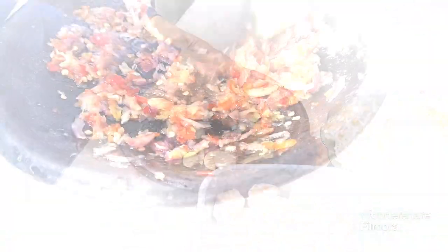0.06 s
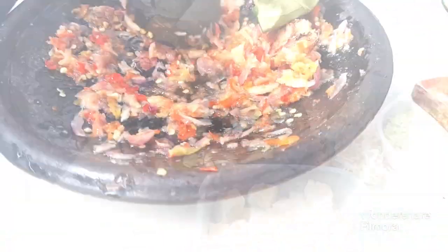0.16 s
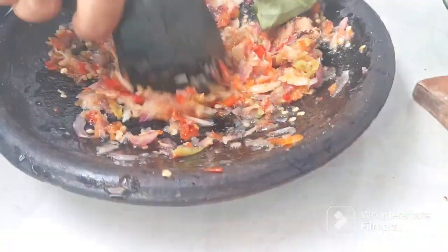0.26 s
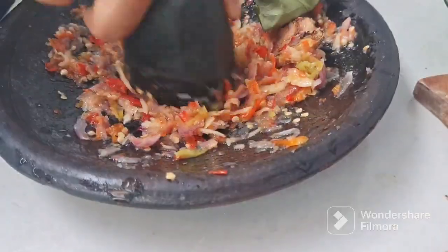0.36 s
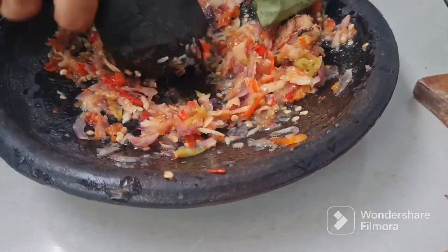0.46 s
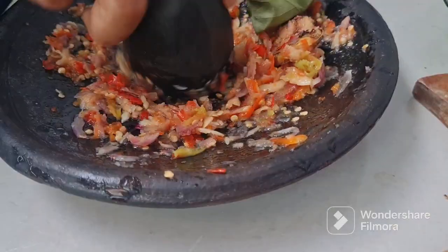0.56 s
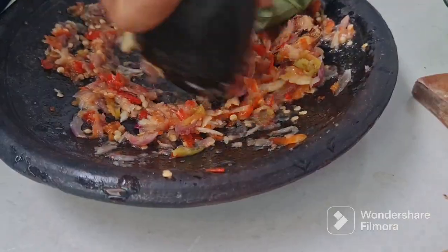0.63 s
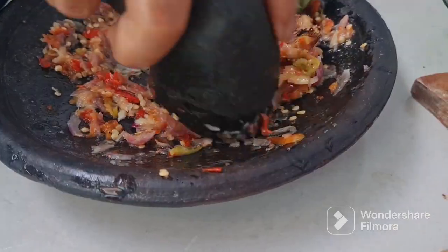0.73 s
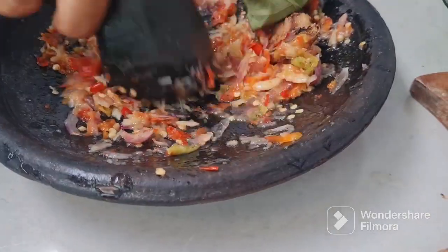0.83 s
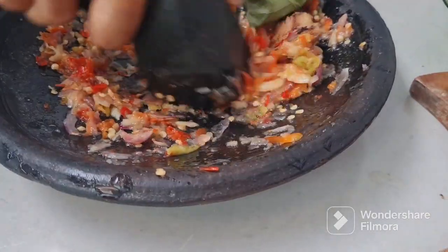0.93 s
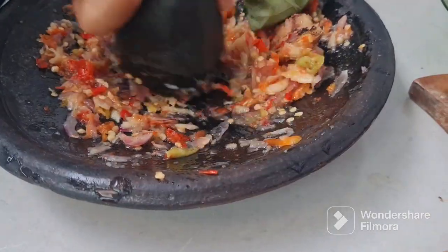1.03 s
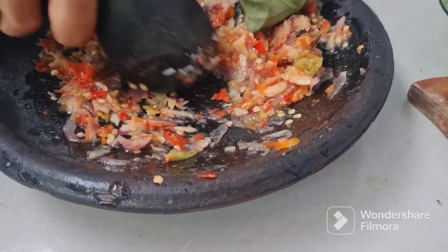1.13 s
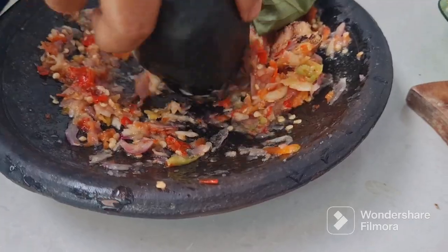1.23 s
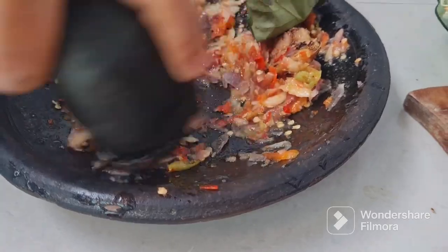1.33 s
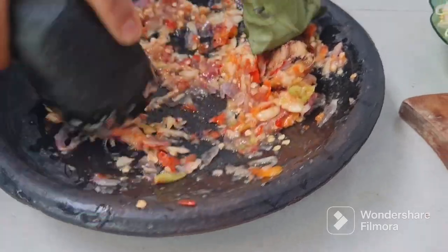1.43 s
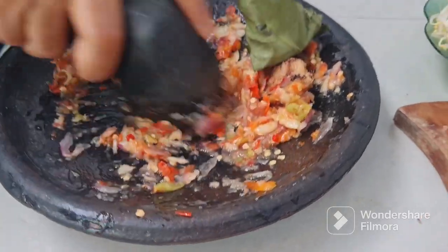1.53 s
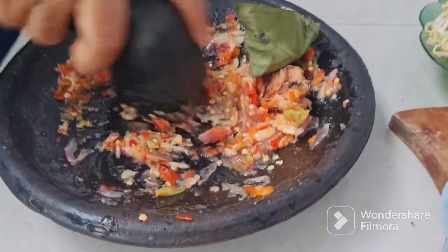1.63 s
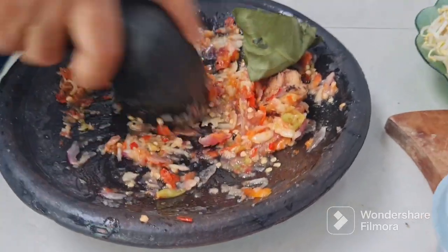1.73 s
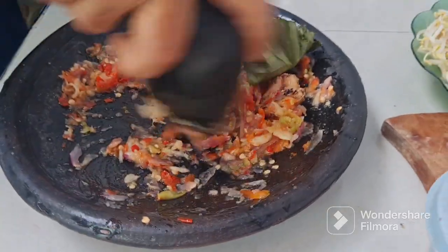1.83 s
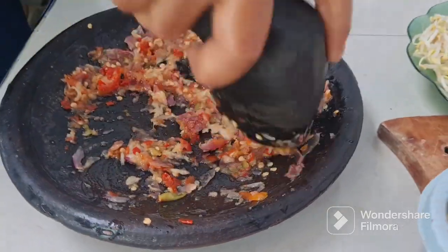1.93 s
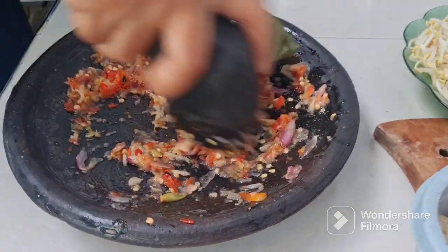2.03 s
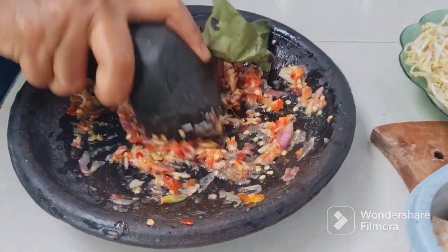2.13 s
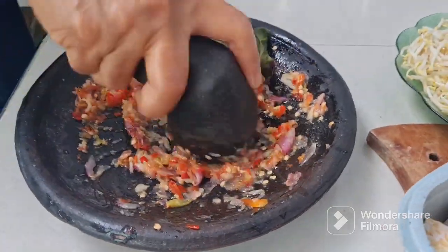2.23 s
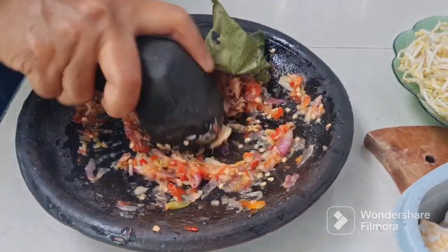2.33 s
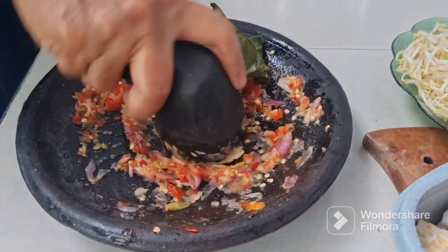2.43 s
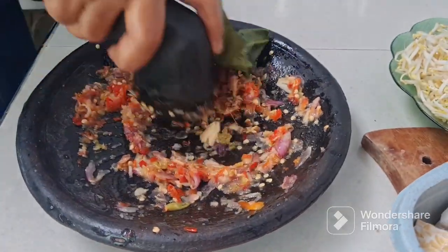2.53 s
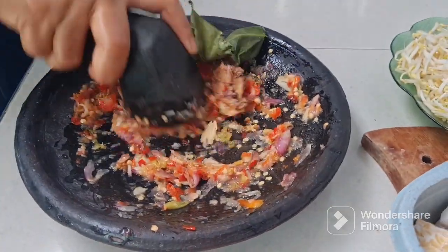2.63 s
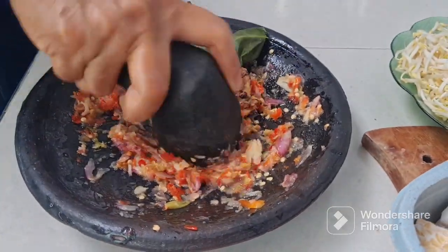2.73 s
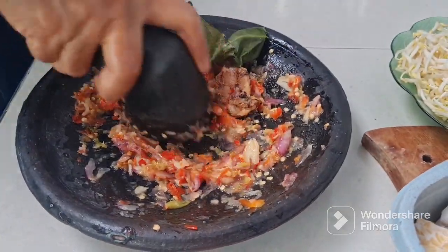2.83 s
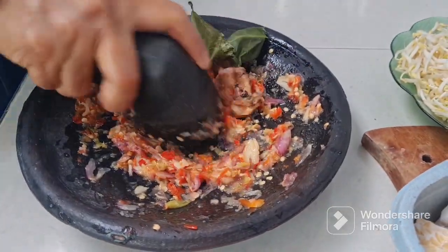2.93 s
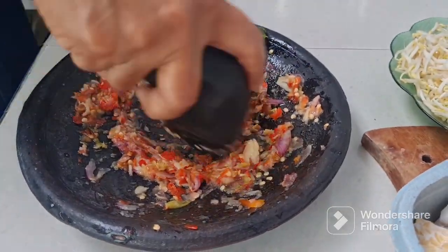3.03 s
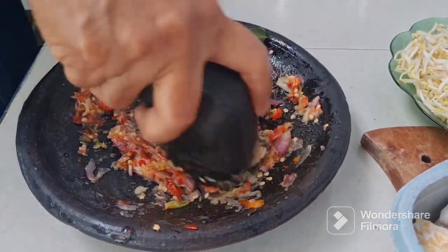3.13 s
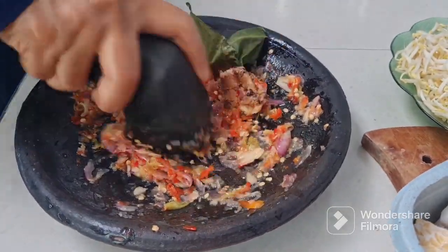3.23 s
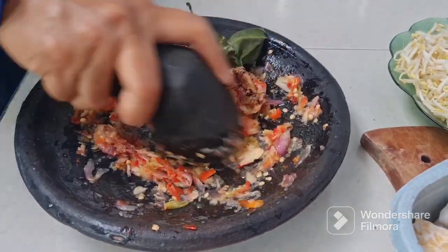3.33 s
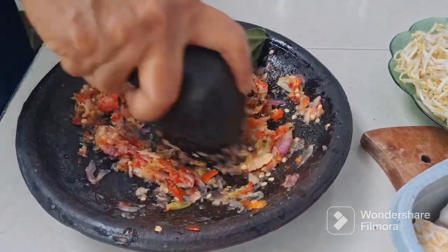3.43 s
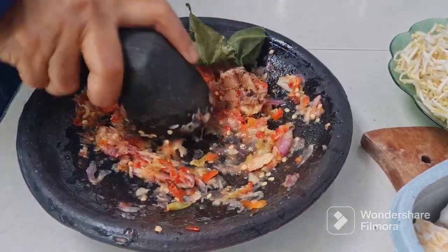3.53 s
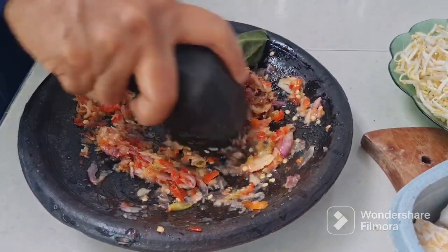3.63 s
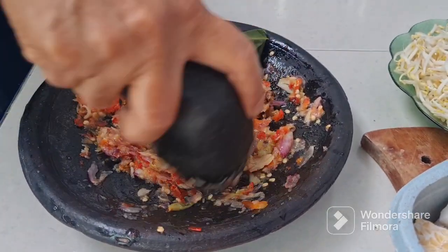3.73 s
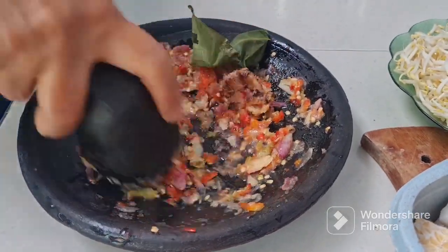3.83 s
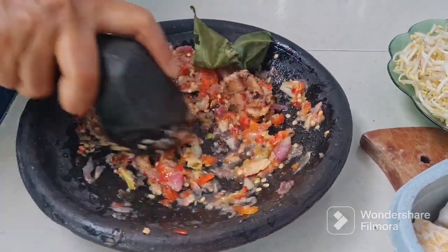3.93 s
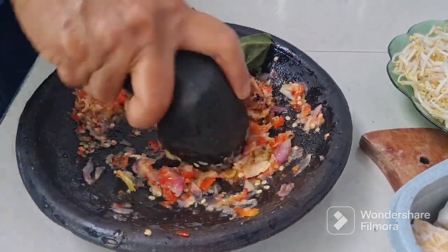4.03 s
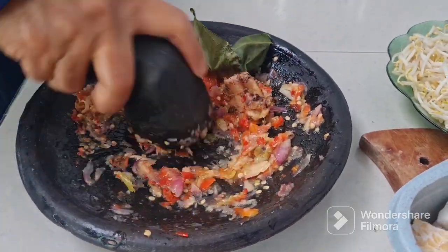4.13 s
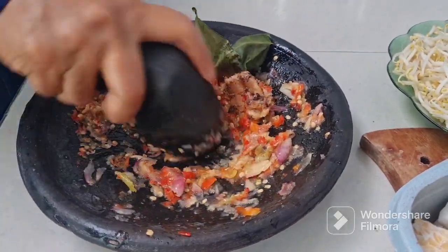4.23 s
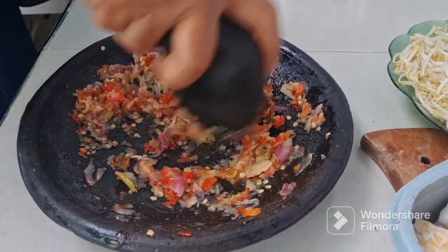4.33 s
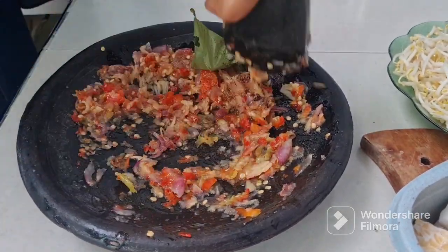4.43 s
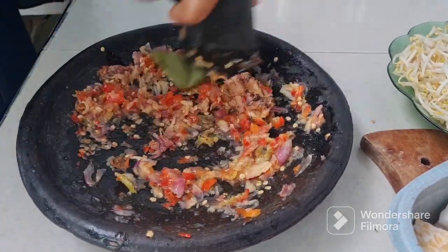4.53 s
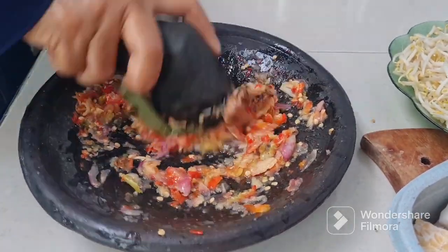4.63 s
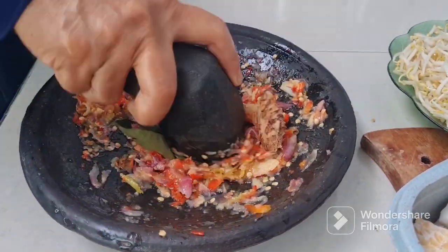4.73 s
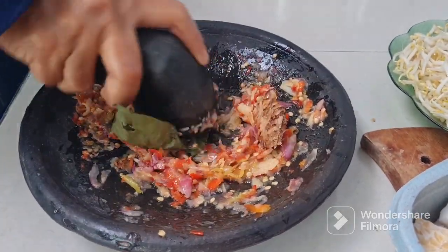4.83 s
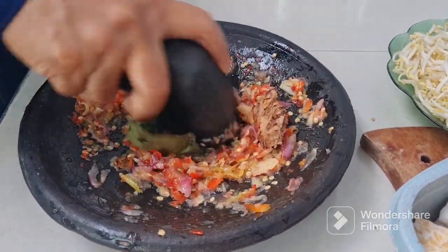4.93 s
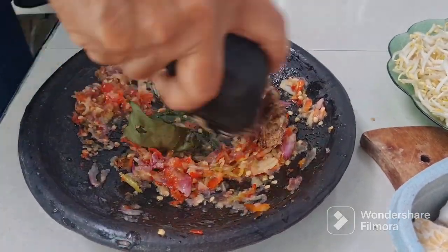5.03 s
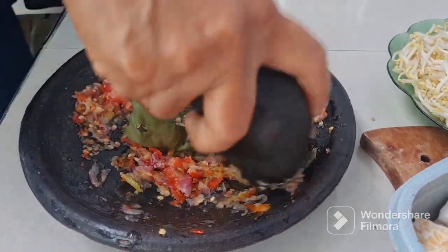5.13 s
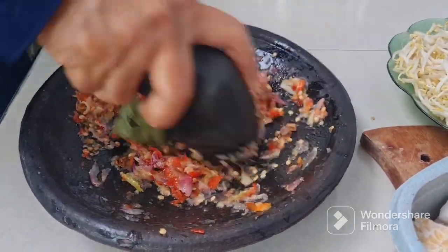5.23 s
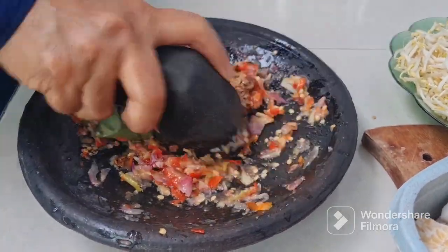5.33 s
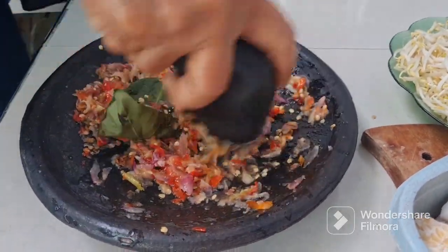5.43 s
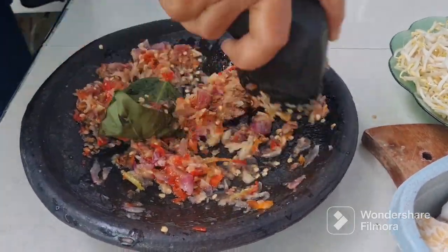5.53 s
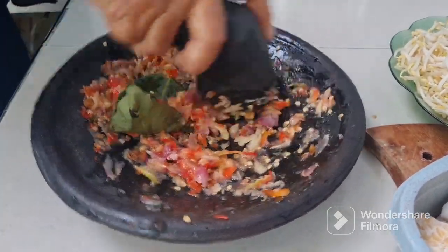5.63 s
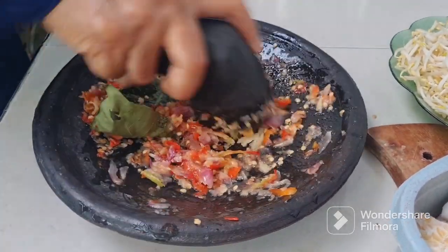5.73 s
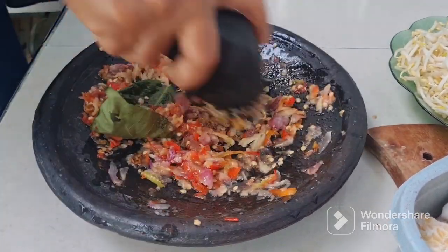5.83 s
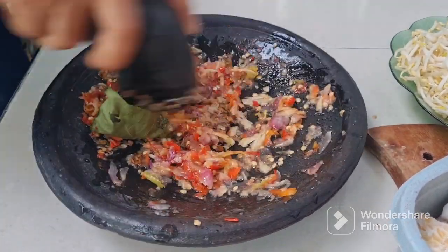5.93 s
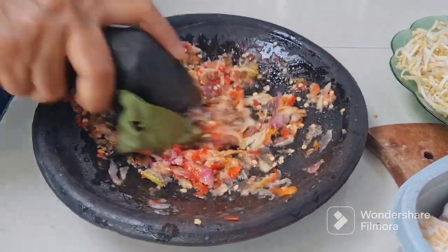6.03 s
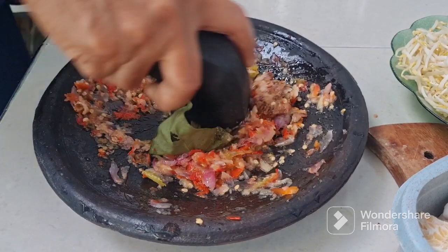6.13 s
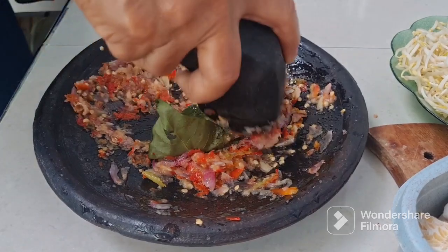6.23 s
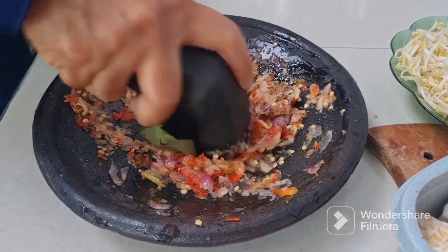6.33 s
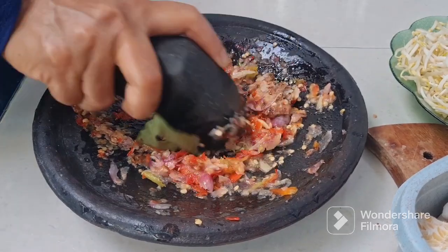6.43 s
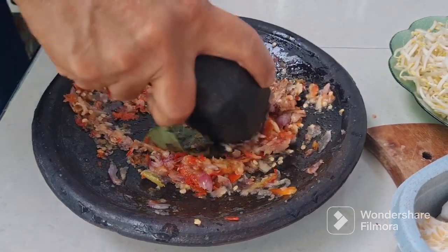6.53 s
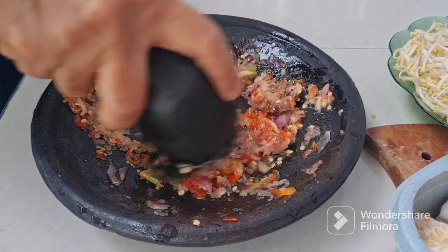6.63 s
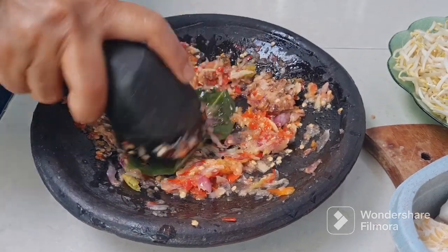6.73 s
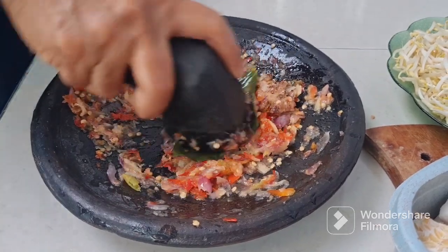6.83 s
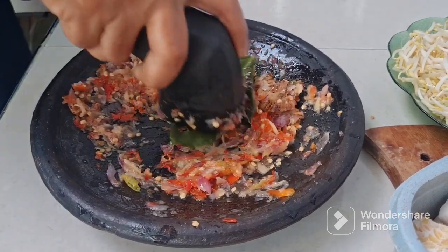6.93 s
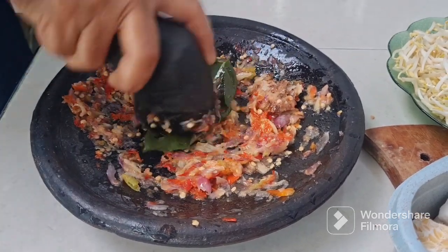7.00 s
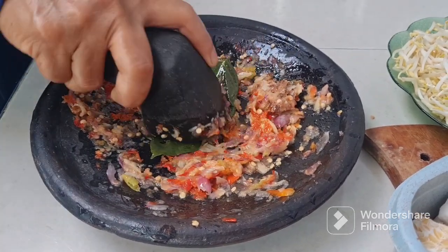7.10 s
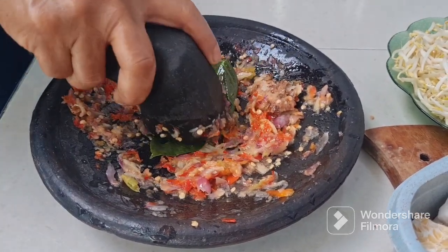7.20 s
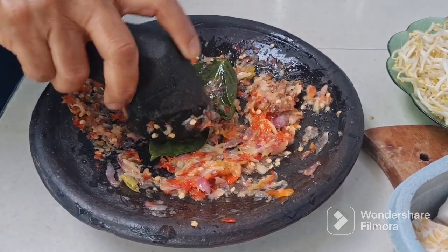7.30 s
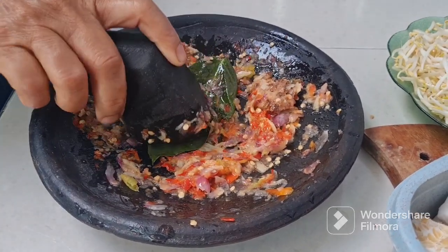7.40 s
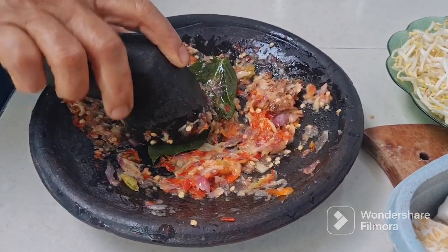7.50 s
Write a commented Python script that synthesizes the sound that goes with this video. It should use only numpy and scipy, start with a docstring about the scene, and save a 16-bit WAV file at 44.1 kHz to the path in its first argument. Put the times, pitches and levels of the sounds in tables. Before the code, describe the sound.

Close, irregular knocks of stone on stone run throughout as a pestle pounds moist vegetables and spices in a mortar. Each low thump is followed by brief gritty, rumbling grinding, with soft squelches and crisp little pops of seeds and skins. The hardest blows come a little past the middle, and the last ones are softer. The kitchen echoes slightly, with a faint hum early on and a faint distant whine near the end.

```python
"""Dull thuds and sharp clacks: a stone pestle pounds and grinds chillies, shallots and garlic in a
shallow stone mortar on a kitchen table. Each impact excites the low modes of mortar and table, and
the short-lived high modes of the stone. Between blows, stick-slip friction makes the pestle judder
over the grit, while wet pulp crackles and seeds snap as they fracture. The hard-walled room
reverberates; a faint motor hum and a far whine lie behind."""
import sys
import numpy as np
from scipy import signal
from scipy.fft import rfft, irfft
from scipy.io import wavfile
from scipy.ndimage import map_coordinates

SR = 44100
rng = np.random.default_rng(int(sys.argv[2]) if len(sys.argv) > 2 else 0)


def transcribe(u):
    """Save the signal u as a 16-bit wav file named by the first command-line argument.

    u: samples, shape (n,) or (channels, n), limited to [-1, 1]; the rate is SR.
    q: integer samples, one column per channel.
    """
    v = np.clip(np.atleast_2d(u).T, -1, 1)
    q = np.round(v * 32767).astype(np.int16)
    wavfile.write(sys.argv[1], SR, q)


N = 333396
TIME = np.arange(N) / SR
BIN_HZ = np.arange(N // 2 + 1) * SR / N

# Levels in the tables are relative: each layer has its own gain.
# pestle blows: (t/s, thud level/dB, thud centre f/Hz, clack level/dB, bright edge level/dB)
BLOWS = [(0.045, -23, 458, -37.5, -41), (0.213, -14, 245, -25, -23.5), (0.525, -8.5, 240, -26, -26.5),
         (0.537, -10.5, 290, -32, -31), (0.558, -12, 240, -32, -51), (0.592, -10, 270, -31, -49),
         (0.789, -8.5, 263, -12, -26), (0.923, -16, 241, -29.5, -33.5), (0.952, -15, 246, -29.5, -38),
         (1.177, -11, 266, -26.5, -36), (1.21, -8.5, 255, -33, -37), (1.236, -12, 270, -26.5, -48),
         (1.413, -8.5, 238, -15, -46), (1.603, -17, 256, -27.5, -38), (1.806, -16.5, 236, -30, -44),
         (2.076, -7.5, 218, -45, -55), (2.21, -14.5, 387, -33.5, -40), (2.389, -23, 166, -41, -45),
         (2.448, -9, 293, -25.5, -35.5), (2.747, -6.5, 245, -22, -28), (2.947, -9.5, 245, -23, -24.5),
         (2.971, -20, 207, -32, -42), (2.999, -10, 253, -45, -40), (3.017, -12, 274, -27.5, -46),
         (3.183, -22.5, 226, -60, -62), (3.341, -14, 258, -29, -32), (3.386, -10, 390, -21.5, -31.5),
         (3.6, -9, 240, -23.5, -27.5), (3.626, -9, 347, -27, -33), (3.662, -8.5, 260, -24, -28.5),
         (3.857, -12, 223, -29.5, -39), (4.051, -14, 426, -28.5, -36), (4.244, -6.5, 232, -20.5, -24),
         (4.264, -11, 350, -25.5, -42), (4.614, -15.5, 254, -16.5, -13.5), (4.722, -13.5, 315, -24.5, -24),
         (4.932, -22, 200, -38.5, -41), (5.208, -3.5, 266, -14.5, -22), (5.216, -28, 293, -15, -36),
         (5.275, -4, 255, -20.5, -22.5), (5.642, -10, 433, -18, -20), (5.717, -9, 303, -12.5, -16.5),
         (6.063, -11.5, 415, -24, -26), (6.103, -9.5, 430, -23, -18), (6.126, -12, 416, -24, -38),
         (6.488, -28.5, 270, -50, -50), (6.747, -8, 240, -38, -44), (6.83, -16, 243, -34.5, -37),
         (7.155, -19.5, 276, -43, -47), (7.385, -17.5, 240, -41.5, -44)]
# modes of the mortar rocking on the table: (f/Hz, level/dB, T60/s)
ROCKING_MODES = [(121, -5, 0.12), (169.6, -2.5, 0.15), (224.7, 3, 0.063), (240, 2, 0.14), (266, -5, 0.16),
                 (296.3, -3.5, 0.18), (336.3, -3.5, 0.18), (383, -8, 0.059), (411.8, 1, 0.14),
                 (464.8, -1.5, 0.11), (592, -13, 0.13)]
# modes of pestle and bowl: (f/Hz, level/dB, T60/s)
BOWL_MODES = [(690, -3, .04), (784, -2, .05), (900, -3, .015), (1150, -2, .015), (1330, 0, .012),
              (1676, 0, .014), (1900, 2, .022), (2150, -1, .01), (2420, 0, .013), (2746, -2, .014),
              (3127, -4, .012)]
# where the pestle lands, heard in its clack: (t/s, left minus right level/dB)
CLACK_PAN = [(0.5, -1), (0.79, 1), (1.41, 2), (2.9, 0), (4.25, -0.5), (4.61, 3), (5.2, 2), (6.1, -2.5)]
# seeds and skins bursting: (t/s, peak level/dB, f/Hz, squelch level re burst/dB)
BURSTS = [(0.0587, -16, 3200, -26), (0.177, -33, 6430, -15), (0.2087, -14.5, 2900, -21),
          (0.3157, -22, 7900, -11), (0.36, -10.5, 3500, -10), (0.5137, -17, 2700, -13),
          (0.6214, -20.5, 5640, -12), (0.9772, -11, 5770, -21), (1.168, -16.5, 5560, -10.5),
          (1.222, -13.5, 9600, -23), (1.2464, -14.5, 5700, -17.5), (1.657, -20, 5650, -30),
          (1.782, -13.5, 5540, -19), (2.231, -6.5, 10100, -27), (2.2443, -7, 5160, -33),
          (2.381, -16.5, 8000, -14), (2.47, -9.5, 5000, -25), (2.659, -27, 5500, -20),
          (2.757, -10.5, 7100, -20), (2.9242, 3, 5500, -32), (2.991, -2.5, 5500, -20.5),
          (3.378, -14.5, 5100, -9.5), (3.4205, -12.5, 5430, -19), (3.557, -10.5, 9800, -34),
          (3.583, -4, 5200, -16), (3.868, -22, 4400, -5), (3.946, -13, 7390, -22), (3.9927, -5, 5500, -36),
          (4.072, -10, 5000, -28), (4.027, -16, 3270, -16), (4.149, -20.5, 2040, -8),
          (4.5705, -28.5, 3990, -11), (4.5983, -27, 2700, -2), (4.9641, -16, 5260, -12),
          (5.3532, -22.5, 4970, -3.5), (5.4155, -19.5, 5030, -10), (5.6396, -15, 3130, -22),
          (6.052, -13.5, 4200, -15), (6.4932, -28, 5500, -4), (6.7233, -18.5, 5050, -11),
          (6.8259, -4.5, 9400, -30), (7.0705, -5.5, 4960, -12.5), (7.382, -12.5, 4970, -22)]
# pushes through the pulp: (t/s, duration/s, pulp level/dB, scrape level/dB, judder level/dB)
STROKES = [(0.045, 0.039, -42, -45, -33), (0.202, 0.14, -37, -42, -27.5), (0.289, .14, -36.5, -35, -42),
           (0.482, 0.11, -36.5, -44, -30), (0.785, 0.35, -41.5, -44, -28.5),
           (1.144, 0.099, -40, -49, -29.5), (1.41, 0.16, -44.5, -49, -31), (1.535, 0.19, -41.5, -46, -32.5),
           (1.722, .08, -44, -45, -27), (2.054, 0.2, -39, -41, -39), (2.19, 0.17, -41.5, -40, -32),
           (2.38, 0.094, -32.5, -42, -21.5), (2.635, 0.11, -37, -36.5, -31),
           (2.76, 0.12, -35.5, -37, -30.5), (2.932, 0.12, -41, -43, -26), (3.171, 0.14, -39.5, -43, -33),
           (3.333, 0.077, -34.5, -35.5, -18.5), (3.491, 0.062, -35, -36.5, -32),
           (3.585, 0.093, -32, -37, -19.5), (3.86, 0.35, -37, -36, -27), (4.234, 0.062, -34.5, -40, -20.5),
           (4.602, 0.15, -41, -54, -25.5), (4.808, 0.19, -43, -42, -34), (5.206, 0.23, -38, -40.5, -23),
           (5.631, 0.16, -41, -34.5, -27), (5.808, 0.1, -62, -39, -25), (6.036, 0.16, -40.5, -50, -28),
           (6.34, 0.2, -42.5, -49.5, -39.5), (6.676, 0.084, -37.5, -41, -44.5),
           (6.793, 0.06, -33.5, -34, -25), (7.065, .04, -39, -53, -39), (7.442, 0.096, -55, -44.5, -42)]
# spectra of the juddering pestle, scraped stone and crushed pulp: (f/Hz, level/dB)
JUDDER_SPECTRUM = [(40, -31), (80, -13), (130, -2), (200, -7), (250, 4.5), (330, -2.5), (420, -3),
                   (550, -19), (780, -17.5), (1100, -38), (2000, -63)]
SCRAPE_SPECTRUM = [(400, -3), (750, -18), (1200, -16), (1900, -5), (2700, 4.5), (3600, 5), (5000, -4.5),
                   (9000, -19)]
PULP_SPECTRUM = [(1500, 21.5), (3200, -3.5), (5400, 4), (7500, -1.5), (10000, -2.5), (13000, -3.5),
                 (16000, -11)]
# kitchen reverberation: (f/Hz, T60/s, level/dB)
REVERBERATION = [(100, 0.78, -6), (298, 0.61, -0.5), (780, 0.49, 4), (2020, 0.56, 0.5), (3940, 0.56, -2),
                 (8000, 0.52, -6), (15200, 0.32, 2)]
# colour of the two microphone ports: (f/Hz, left minus right level/dB)
PORT_BALANCE = [(60, -10), (87, -7.5), (130, -1), (180, -3.0), (260, -3.5), (380, -1.5), (550, -3.5),
                (790, -1.5), (1140, -3), (1650, -0.5), (2380, -6), (3440, -5.5), (4970, -9), (7180, -5.5),
                (10400, -2.5), (15000, -5.5)]
# hum of a motor outside: (t/s, fundamental level/dB, fourth harmonic level/dB)
HUM_LEVELS = [(0, -50, -54), (1.7, -54, -49.5), (2.3, -45, -33), (2.9, -43, -33), (3.3, -46, -44),
              (4.2, -43.5, -41.5), (4.8, -55, -56), (7.56, -78.5, -65)]
# far whine: (t/s, f/Hz, level/dB)
WHINE_CONTOUR = [(6.1, 738, -83), (6.3, 752, -44.5), (6.55, 751, -65.5), (6.7, 774, -45), (7.0, 767, -49.5),
                 (7.2, 747, -61), (7.33, 696, -52), (7.42, 622, -47.5), (7.56, 645, -48)]
# spectrum of the room air: (f/Hz, level/dB)
AIR_SPECTRUM = [(22, -7), (32, 3), (44, 6.5), (60, 5), (120, -4), (250, -16), (500, -24), (800, -10.5),
                (1300, -28), (3000, -18.5), (7000, -33), (16000, -42)]


def thuds(focus_octaves, squash_s):
    """Cushioned impact: pulp spreads the force in time, so the modes of mortar and table swell briefly."""
    out, t = np.zeros(N), TIME[:SR // 4]
    mode_hz = np.array(ROCKING_MODES)[:, 0]
    for s, db, centre_hz, _, _ in BLOWS:
        weights = 1 / (1 + (np.log2(mode_hz / centre_hz) / focus_octaves) ** 2)
        ring = weights @ damped_modes(ROCKING_MODES, t, scatter_db=1.0)
        thud = ring * (1 - np.exp(-t / squash_s))
        add(out, s, from_db(db) * unit_energy(band(thud, 62, 1500)))
    return out


def clacks(crack_s, ring_share, edge_db, tick_share, hardness_hz):
    """Hard impact: stone on stone cracks and rings; a harder blow is briefer, so its spectrum is wider."""
    out, t = np.zeros(N), TIME[:SR // 10]
    for s, _, _, clack_db, bright_db in BLOWS:
        crack = unit_energy(band(rng.standard_normal(len(t)) * np.exp(-t / crack_s), 310, 7100))
        ring = unit_energy(damped_modes(BOWL_MODES, t, scatter_db=2.5).sum(0))
        blow = crack + ring_share * ring
        top_hz = 800 + hardness_hz * from_db(clack_db)
        body = unit_energy(band(blow, 535, top_hz))
        edge = unit_energy(band(blow, 1610, 3160))   # stronger where no pulp lies between
        tick = tick_share * unit_energy(band(crack, 6400, 14000))
        add(out, s, from_db(clack_db) * (body + tick) + from_db(bright_db + edge_db) * edge)
    return out


def snaps(burst_s, swell_s, tear_s, width):
    """Fracture under load: a squeezed piece leaks juice, bursts, and its skin tears on a little longer."""
    out, t = np.zeros(N), TIME[:SR // 8] - TIME[SR // 32]   # the burst is at t = 0
    swell = np.exp(-np.maximum(-t / swell_s, t / tear_s))
    for s, db, hz, squelch_db in BURSTS:
        burst, tear, lumps = rng.standard_normal((3, len(t)))
        forces = np.array([burst * (t >= 0) * np.exp(-np.abs(t) / burst_s), tear * lumps])
        pitched = band(forces, hz / (1 + width), hz * (1 + width))
        snap, squelch = pitched + 0.68 * band(forces, 2100, 10700)
        juice = from_db(squelch_db) * swell * unit_rms(squelch)
        add(out, s + t[0], from_db(db) * (snap / np.abs(snap).max() + juice))
    return out


def judder(slips_per_s):
    """Stick-slip friction: each slip over the grit is an impulse that shakes mortar and table."""
    slips = grains(slips_per_s, spread_db=2.0)
    response = band(damped_modes(ROCKING_MODES, TIME[:SR // 4], scatter_db=-3.0).sum(0), 74, 600)
    ring = unit_rms(signal.fftconvolve(slips, response)[:N])
    return unit_rms(coloured(slips, JUDDER_SPECTRUM) + 0.59 * ring)


def crackle(spectrum, per_s, spread_db, clump_db, range_hz, hiss_share):
    """Microfracture: cells and grit give way in clumps, each grain ringing briefly at its own pitch."""
    clicks = grains(per_s, spread_db) * from_db(clump_db * drift(140))
    pitches = np.geomspace(*range_hz, num=12)
    pitch_index = rng.integers(0, len(pitches), N)
    rings = sum(band(clicks * (pitch_index == k), hz / 1.156, hz * 1.21) for k, hz in enumerate(pitches))
    return coloured(unit_rms(rings) + hiss_share * rng.standard_normal(N), spectrum)


def push_envelope(length_s, attack_s, release_db_per_s, ease_db_per_s=10.5):
    """Yielding under load: a push bites quickly, eases as the pulp gives way, then lets go."""
    t = TIME[:SR]
    fall_db = ease_db_per_s * t + release_db_per_s * np.maximum(t - length_s, 0)
    return np.minimum(t / attack_s, 1) * from_db(-fall_db)


def grinding_gains(skid_db, skid_db_per_s, tremor_db):
    """Incoherent addition: pushes, the skid after each blow and the hand's tremor sum in power."""
    pulp, scrape, shake = np.zeros((3, N))
    for s, length_s, pulp_db, scrape_db, judder_db in STROKES:
        crushing = push_envelope(length_s, attack_s=0.012, release_db_per_s=184)
        shaking = push_envelope(length_s, attack_s=0.013, release_db_per_s=79)
        add(pulp, s, (from_db(pulp_db) * crushing) ** 2)
        add(scrape, s, (from_db(scrape_db) * crushing) ** 2)
        add(shake, s, (from_db(judder_db) * shaking) ** 2)
    for s, thud_db, *_ in BLOWS:
        add(shake, s, from_db(thud_db + skid_db - skid_db_per_s * TIME[:SR]) ** 2)
    return np.sqrt([pulp, scrape, shake + from_db(tremor_db) ** 2])


def room_response(build_s):
    """Diffuse field: echoes, uncorrelated left and right, decay exponentially, fastest in the treble."""
    t, room = TIME[:SR], np.array(REVERBERATION)
    edges_hz = 60 * 2 ** np.arange(0, 8.6, .5)
    out = 0
    for low, high in zip(edges_hz, edges_hz[1:]):
        centre_hz = np.sqrt(low * high)
        t60, db = at_hz(room[:, :2], centre_hz), at_hz(room[:, ::2], centre_hz)
        out = out + band(rng.standard_normal((2, SR)), low, high) * from_db(db - 60 * t / t60)
    return unit_rms(out * (1 - np.exp(-t / build_s))) / np.sqrt(SR)


def in_room(x, rooms, room_db, mean_lag_s=0.000136):
    """Path difference: sound arrives first on the left; lag and echoes shift as hand and pestle move."""
    lag = mean_lag_s * SR * (1 + .25 * drift(5))
    direct = np.array([x, map_coordinates(x, [np.arange(N) - lag])])
    shares = np.exp([2 * drift(3) for _ in rooms])
    shares /= np.linalg.norm(shares, axis=0)
    echoes = sum(reverberate(share * x, room) for share, room in zip(shares, rooms))
    return direct + from_db(room_db) * echoes


def through_ports(x):
    """Frequency response: each microphone port colours the sound in its own way."""
    return irfft(rfft(x) * pan(at_hz(PORT_BALANCE, BIN_HZ)), N)


def motor_hum(hz, waver):
    """Periodic vibration: a motor outside radiates a fundamental and its fourth harmonic."""
    first_db, fourth_db = in_time(HUM_LEVELS)
    phase = 2 * np.pi * np.cumsum(hz * (1 + waver * drift(5.2))) / SR
    return np.sqrt(2) * (from_db(first_db) * np.sin(phase) + from_db(fourth_db) * np.sin(4 * phase))


def far_whine(octave_db, waver):
    """Frequency modulation: a gliding tone and its octave waver at random."""
    hz, db = in_time(WHINE_CONTOUR)
    phase = 2 * np.pi * np.cumsum(hz * (1 + waver * drift(90))) / SR
    return np.sqrt(2) * from_db(db) * (np.sin(phase) + from_db(octave_db) * np.sin(2 * phase))


def room_air(common_db, diffuse_db):
    """Partial coherence: one noise is common to both sides; a higher one is uncorrelated between them."""
    common = coloured(rng.standard_normal(N), AIR_SPECTRUM)
    diffuse = band(coloured(rng.standard_normal((2, N)), AIR_SPECTRUM), 520, 17000)
    return from_db(common_db) * common, from_db(diffuse_db) * diffuse


def damped_modes(modes, t, scatter_db):
    """Free vibration: one decaying sine per mode, with random phase and scattered level."""
    hz, db, t60 = np.transpose(modes)[:, :, None]
    phase = 2 * np.pi * (hz * t + rng.random(hz.shape))
    return from_db(db + scatter_db * rng.standard_normal(hz.shape) - 60 * t / t60) * np.sin(phase)


def grains(per_s, spread_db):
    """Poisson process: independent clicks, mostly small and a few large."""
    sizes = from_db(spread_db * np.minimum(rng.exponential(1, N), 4)) * rng.choice([-1, 1], N)
    return sizes * (rng.random(N) < per_s / SR)


def drift(per_s):
    """Linear interpolation between random values; rms 1."""
    return unit_rms(np.interp(TIME * per_s, np.arange(N), rng.standard_normal(N)))


def reverberate(x, room):
    """Convolution with a stereo impulse response."""
    return signal.fftconvolve(x[None], room, axes=1)[:, :N]


def coloured(x, spectrum):
    """Spectral shaping by a smooth curve; rms 1."""
    return unit_rms(irfft(rfft(x) * from_db(at_hz(spectrum, BIN_HZ)), N))


def band(x, low_hz, high_hz):
    """Causal band-pass filtering."""
    sos = signal.butter(2, [low_hz, min(high_hz, .47 * SR)], "band", fs=SR, output="sos")
    return signal.sosfilt(sos, x)


def add(track, s, sound):
    """Superposition of a sound at time s."""
    at = max(round(s * SR), 0)
    track[at:at + len(sound)] += sound[:max(N - at, 0)]


def in_time(rows):
    """Interpolation of a table's columns at every sample."""
    s, *columns = np.transpose(rows)
    return [np.interp(TIME, s, column) for column in columns]


def at_hz(points, hz):
    """Interpolation on a log-frequency axis."""
    f, value = np.transpose(points)
    return np.interp(np.log(np.maximum(hz, 1)), np.log(f), value)


def pan(db):
    """Level difference, left minus right, as two gains."""
    return from_db([db / 2, -db / 2])


def from_db(db):
    """Amplitude ratio of a level."""
    return 10 ** (np.asarray(db) / 20)


def unit_rms(x):
    """Normalisation to an rms of 1."""
    return x / np.sqrt(np.mean(x ** 2) + 1e-20)


def unit_energy(x):
    """Normalisation to the energy of one second at an rms of 1."""
    return x / np.sqrt(np.sum(x ** 2) / SR + 1e-20)


def scene():
    """Superposition: blows, snaps and grinding sound in the kitchen over hum, whine and air."""
    pulp_gain, scrape_gain, judder_gain = grinding_gains(skid_db=-14.5, skid_db_per_s=85, tremor_db=-49.5)
    rooms = [room_response(build_s=0.00033) for _ in range(3)]
    table = from_db(-24.0) * thuds(focus_octaves=0.7, squash_s=0.0019)
    stone = from_db(-19.5) * clacks(crack_s=0.0013, ring_share=0.43, edge_db=3.5,
                                    tick_share=0.033, hardness_hz=5000)
    seeds = snaps(burst_s=0.0013, swell_s=0.0024, tear_s=0.01, width=0.22)
    rumble = from_db(-3.0) * judder_gain * judder(slips_per_s=400)
    scrape = scrape_gain * crackle(SCRAPE_SPECTRUM, per_s=1600, spread_db=2.0, clump_db=5.5,
                                   range_hz=(700, 5000), hiss_share=0.14)
    pulp = pulp_gain * crackle(PULP_SPECTRUM, per_s=2500, spread_db=1.0, clump_db=1.5,
                               range_hz=(2700, 14900), hiss_share=0.052)
    air, diffuse_air = room_air(common_db=-47.5, diffuse_db=-50)
    hum = motor_hum(hz=42.45, waver=0.0094)
    whine = reverberate(far_whine(octave_db=-5.5, waver=0.044), rooms[0])
    background = (air + hum) * from_db([[-1.5], [1.5]]) + diffuse_air + whine
    crush = in_room(seeds + pulp + scrape, rooms, room_db=-6)
    thudding = in_room(table + rumble, rooms, room_db=-18)
    landing_db, = in_time(CLACK_PAN)
    clacking = in_room(stone, rooms, room_db=-2.5) * pan(landing_db)
    return through_ports(thudding + clacking + crush) + background


def record(dry):
    """Saturation and band limiting: the hardest peaks overload; the deepest bass and the top are cut."""
    thinned = signal.sosfilt(signal.butter(4, 31, "high", fs=SR, output="sos"), dry)
    rounded = thinned / (1 + thinned ** 6) ** (1 / 6)
    return signal.sosfilt(signal.ellip(10, .1, 80, 16100, fs=SR, output="sos"), rounded)


dry = scene()
out = record(dry)
transcribe(out)
```